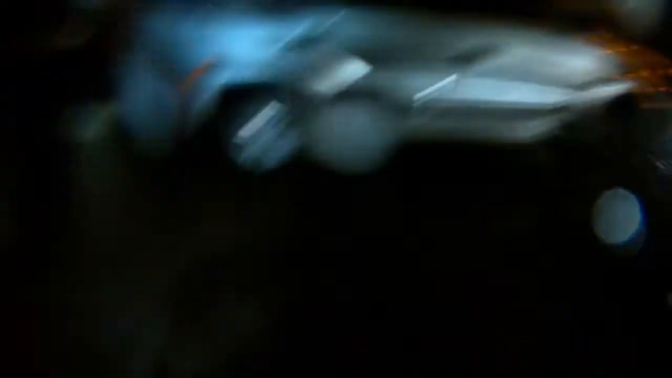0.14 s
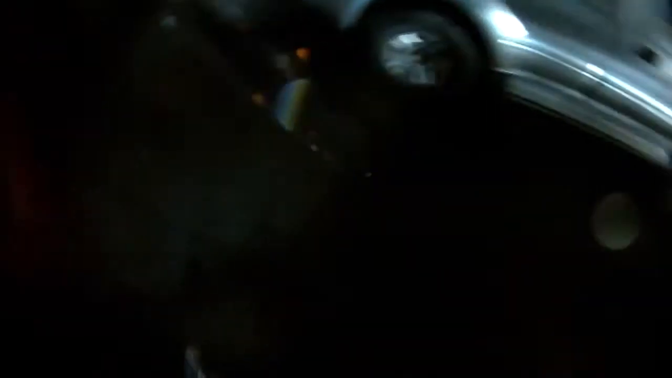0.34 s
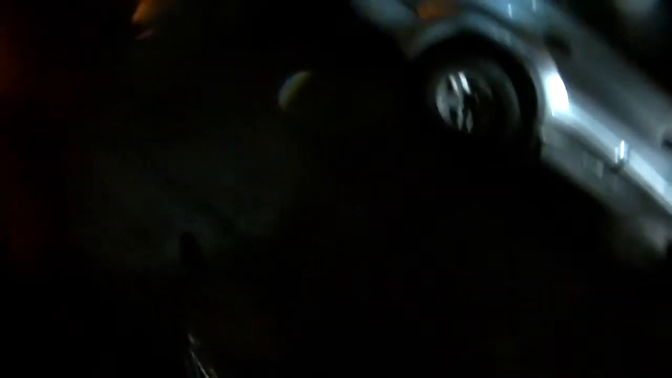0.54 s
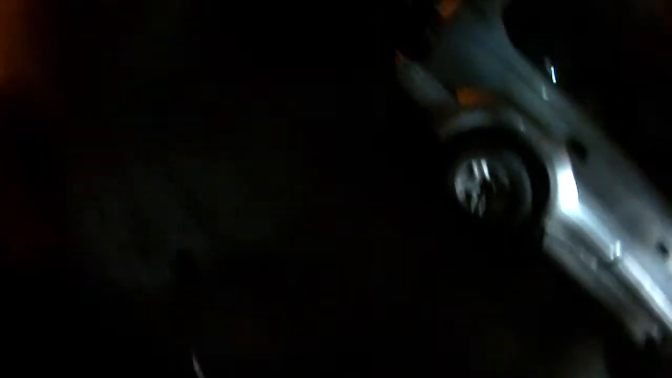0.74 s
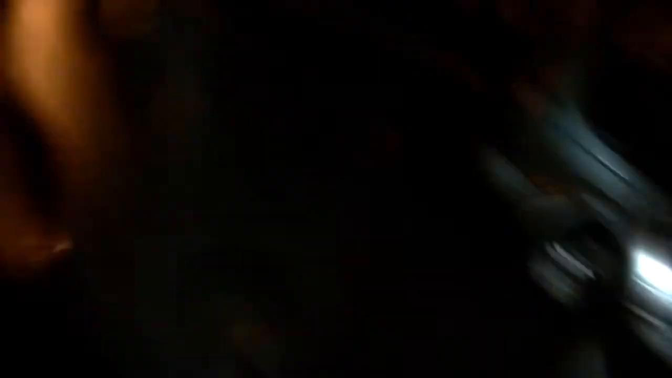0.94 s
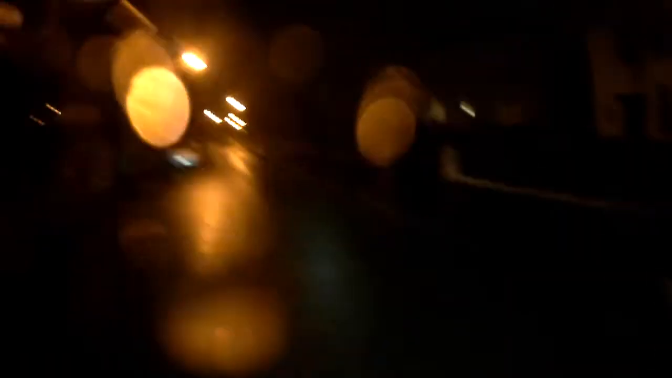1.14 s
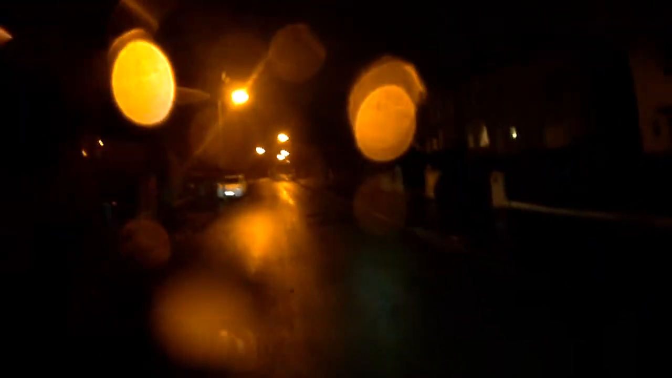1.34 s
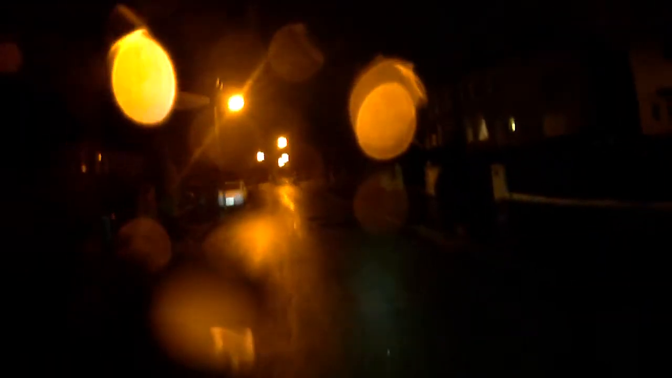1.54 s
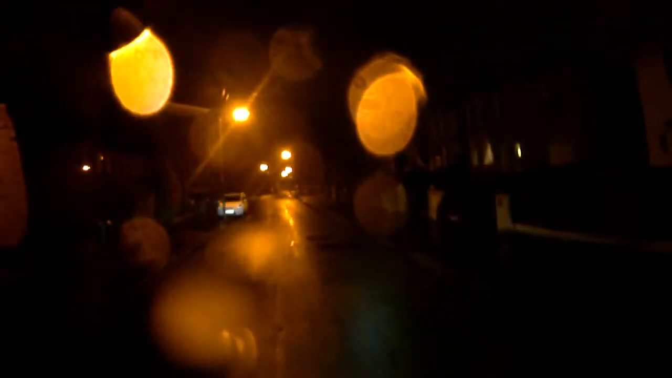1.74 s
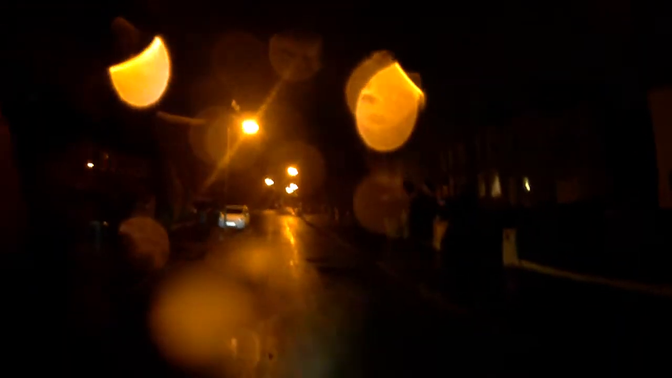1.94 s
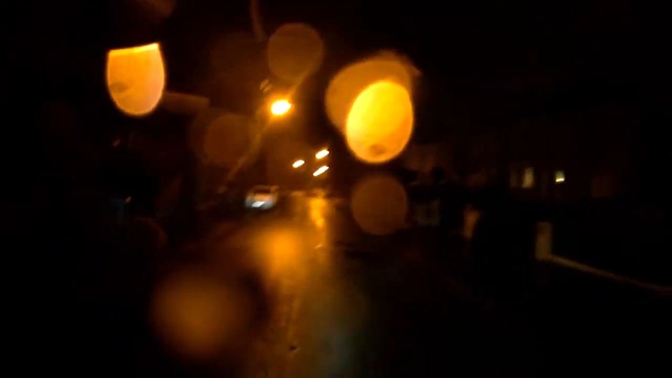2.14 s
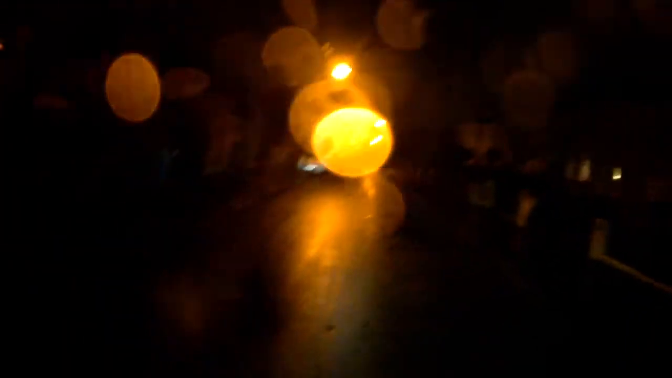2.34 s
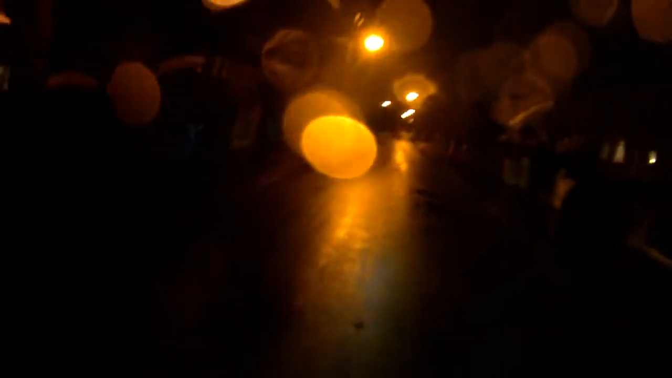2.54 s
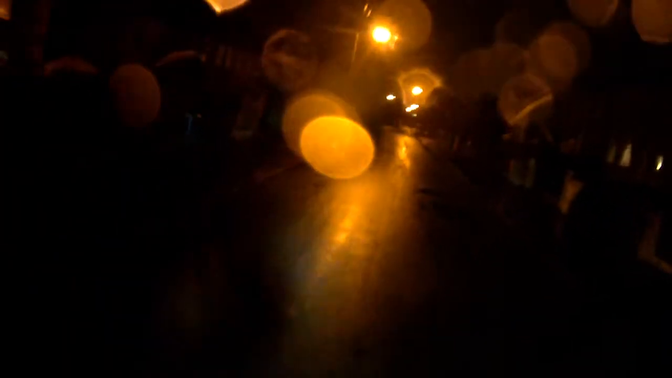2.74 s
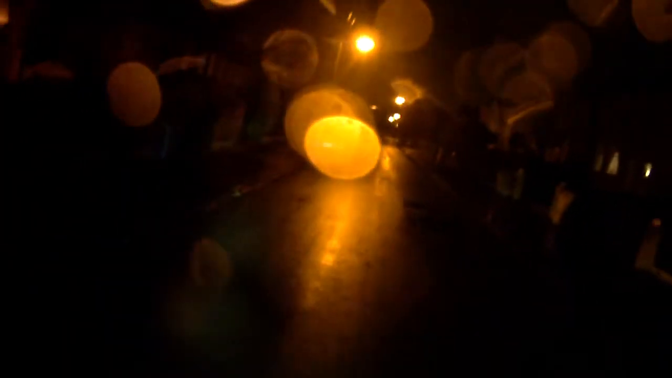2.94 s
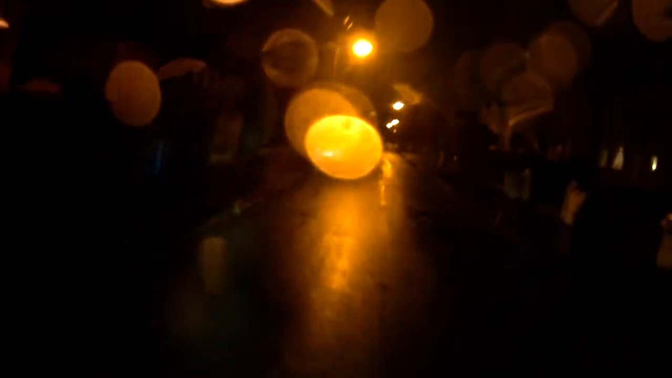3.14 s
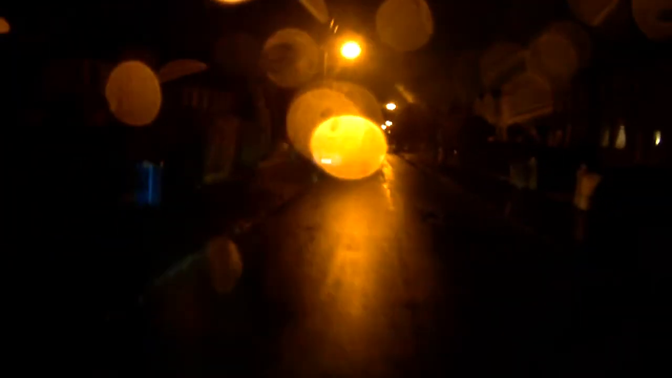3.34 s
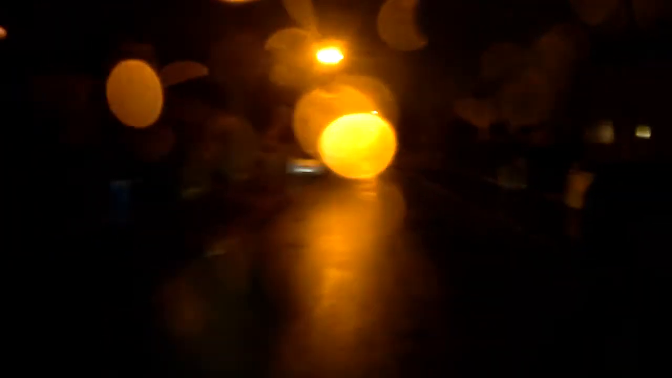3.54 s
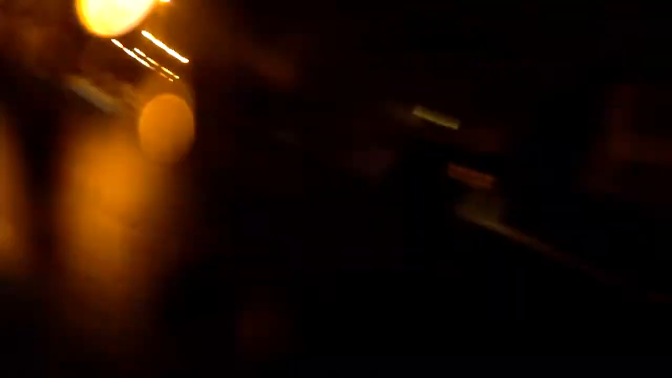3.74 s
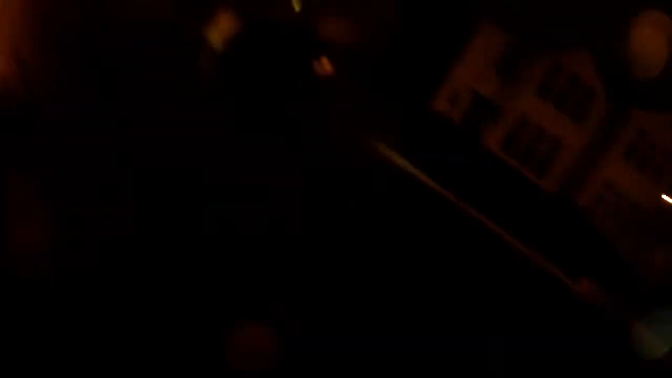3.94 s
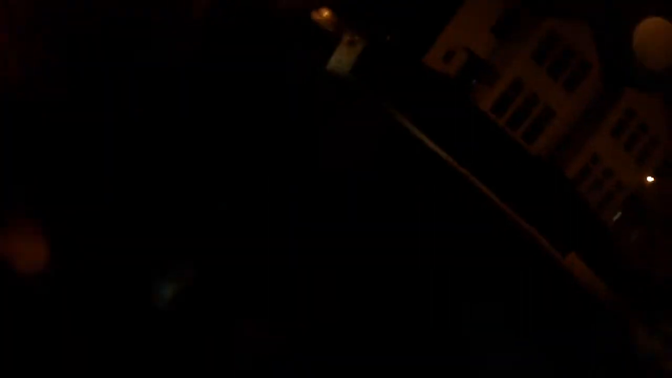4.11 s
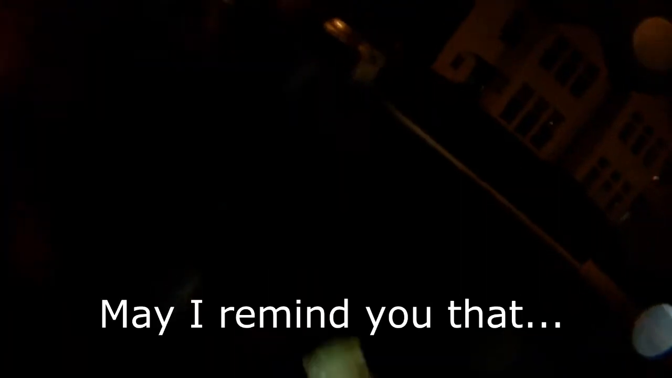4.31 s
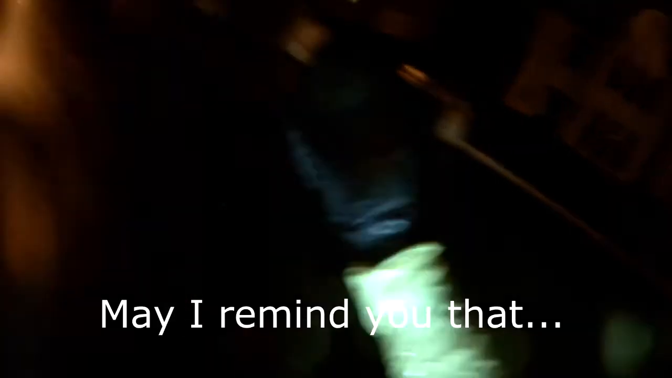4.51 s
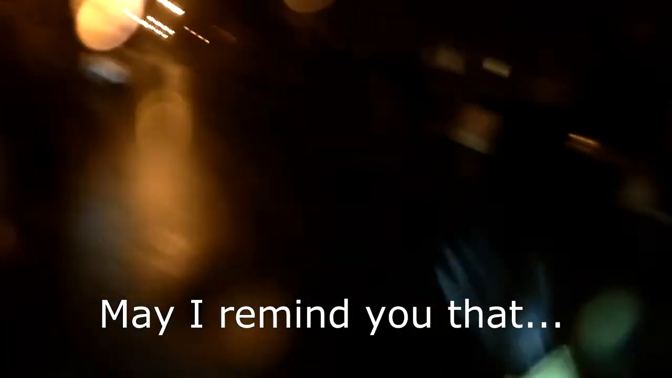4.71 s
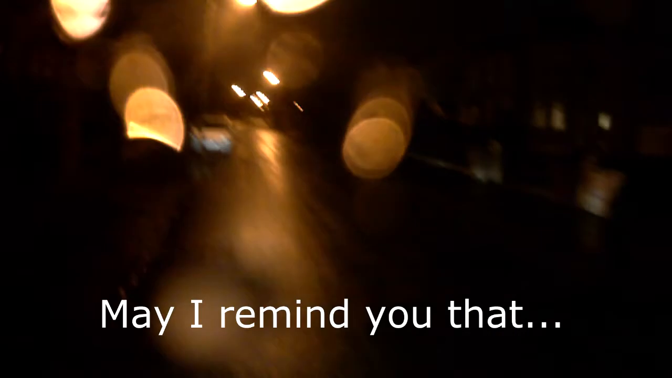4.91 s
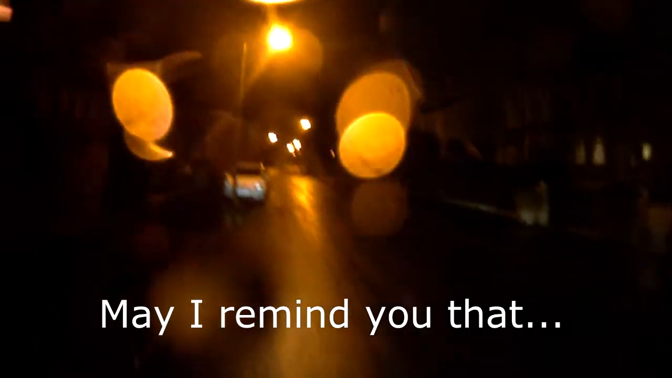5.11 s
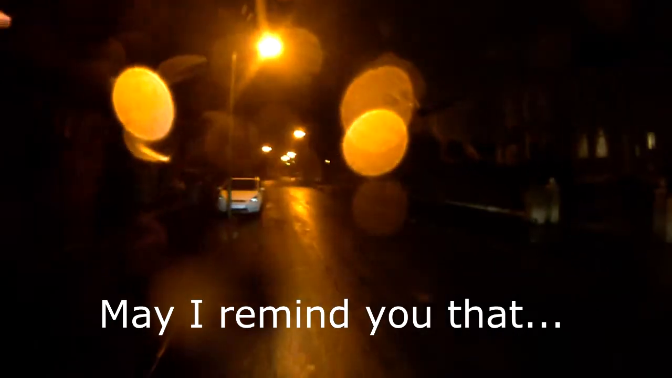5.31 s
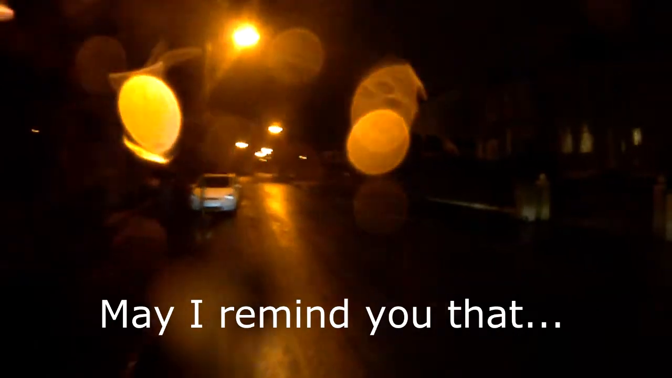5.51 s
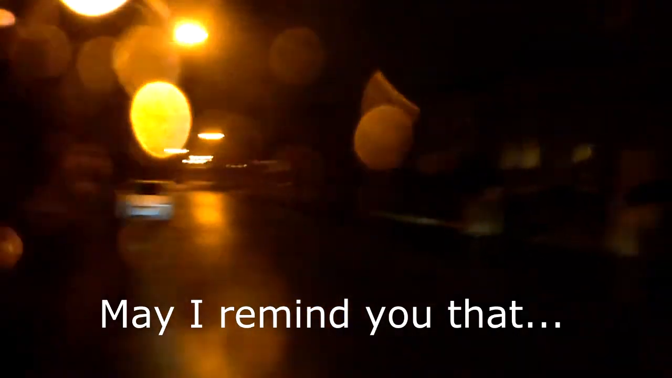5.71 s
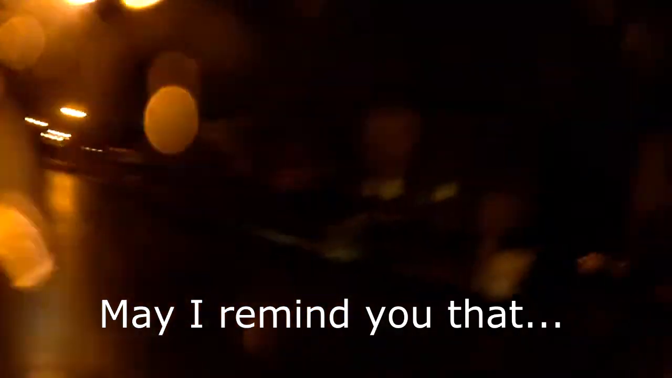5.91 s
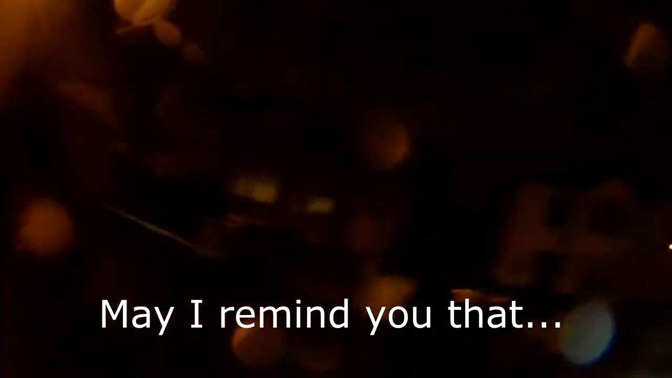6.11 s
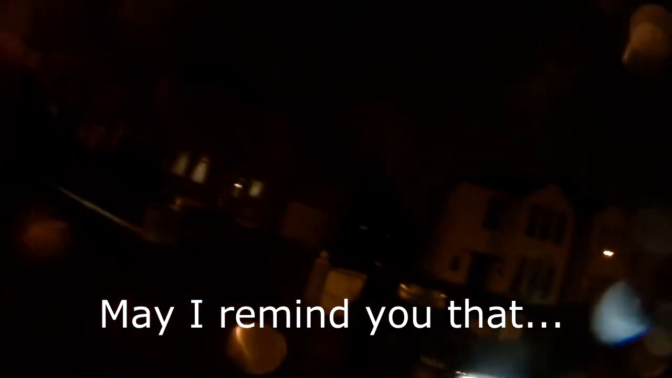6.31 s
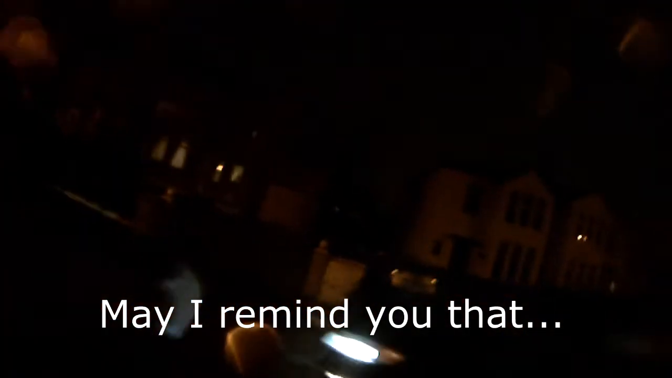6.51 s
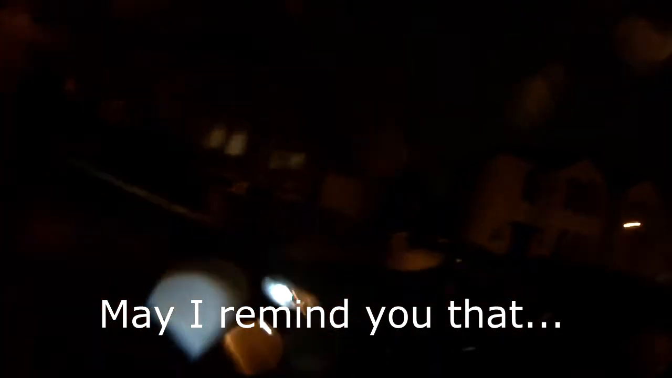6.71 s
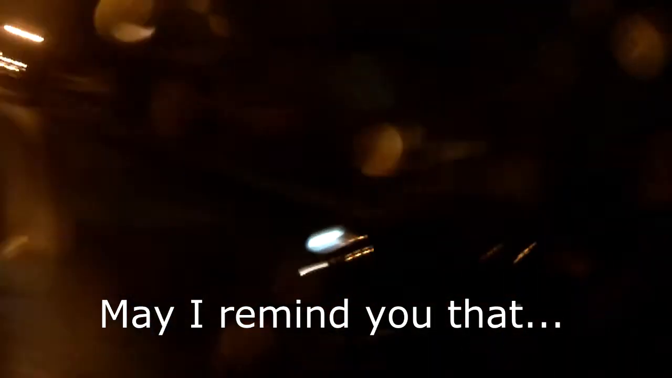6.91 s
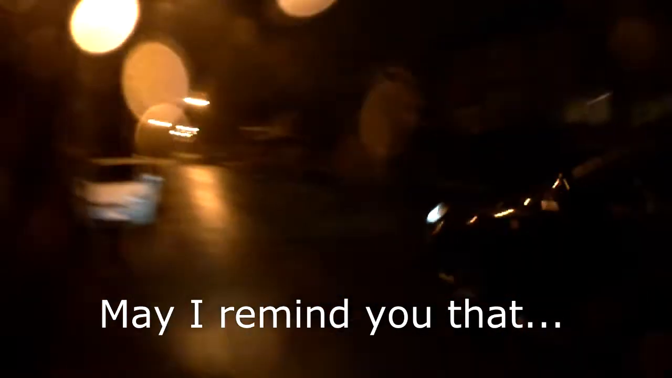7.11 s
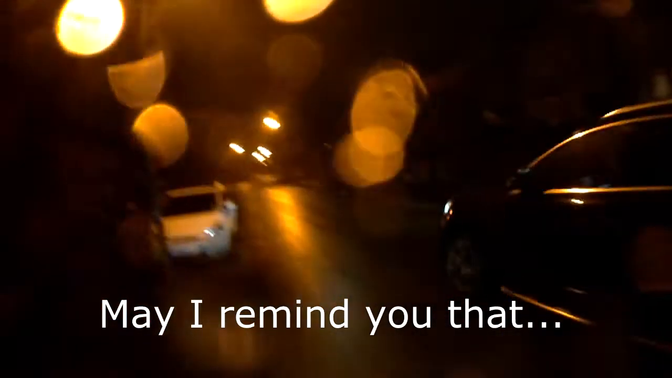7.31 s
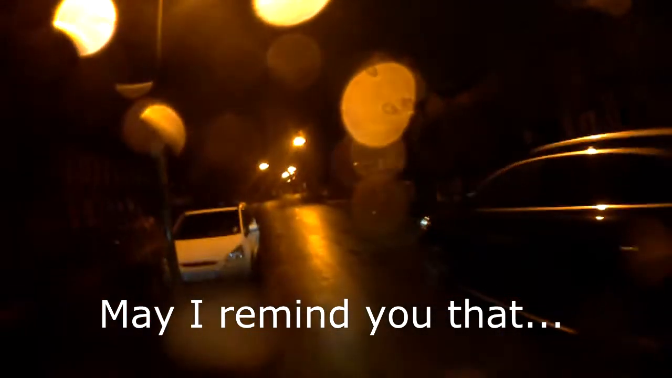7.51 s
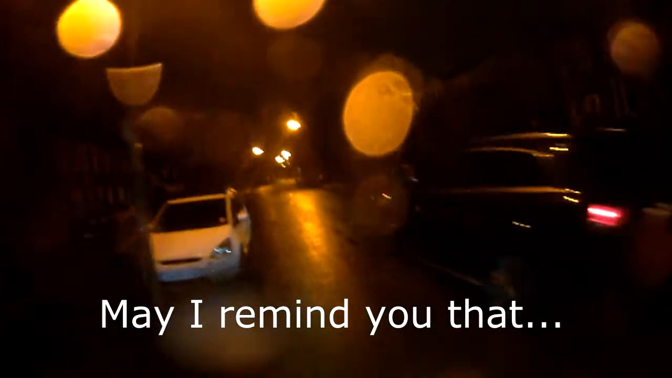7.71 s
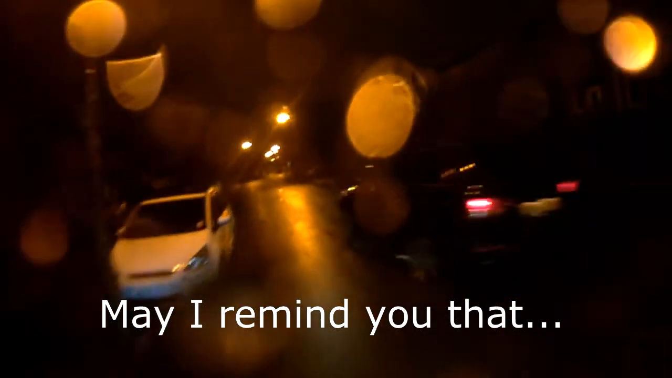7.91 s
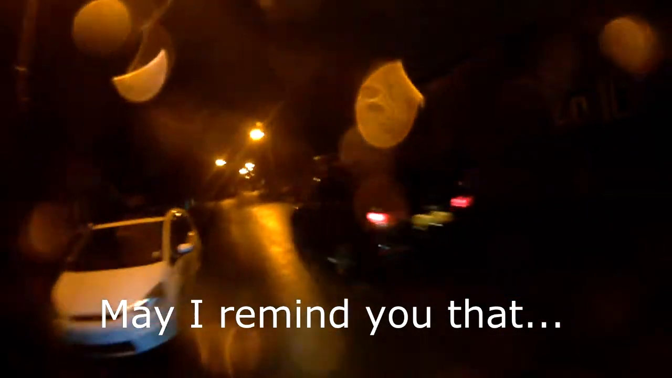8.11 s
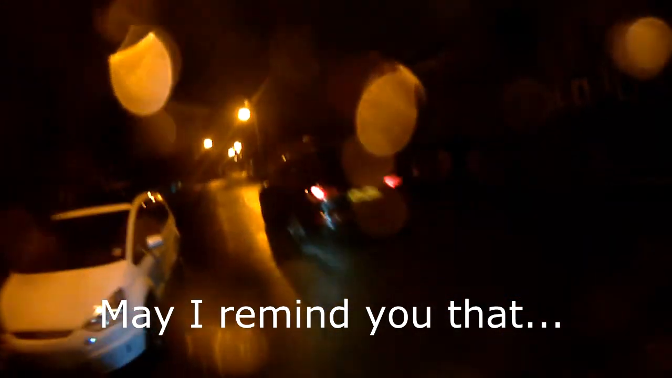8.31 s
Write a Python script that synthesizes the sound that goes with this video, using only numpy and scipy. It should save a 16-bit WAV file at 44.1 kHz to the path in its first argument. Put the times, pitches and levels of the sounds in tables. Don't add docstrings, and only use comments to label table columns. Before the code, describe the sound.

A diesel car idles quietly beside a cyclist in rain, then revs, surges and passes with wet tyre hiss while drops tick sharply on the microphone case.

```python
import sys
import numpy as np
from scipy import signal
from scipy.fft import rfft, irfft, next_fast_len
from scipy.io import wavfile
from scipy.ndimage import uniform_filter1d

SR = 44100
rng = np.random.default_rng(int(sys.argv[2]) if len(sys.argv) > 2 else 0)


def output_pcm(signal):
    pcm = np.clip(np.atleast_2d(signal).T, -1, 1) * 32767
    wavfile.write(sys.argv[1], SR, np.round(pcm).astype(np.int16))


def gain_from_db(level_db):
    decades = np.asarray(level_db, float) / 20
    return 10 ** decades


N = 368235
T = np.arange(N) / SR

# (time [s], firing rate [Hz], clean knock against tyre roar [dB])
ENGINE_SPEED = [(0, 39, 1.5), (.9, 38.98, 3.5), (1.1, 38.94, 1.5), (1.9, 39.02, 4), (2.1, 38.9, -1.5),
                (2.45, 39, 1.5), (2.8, 43.34, -1), (3.0, 54.75, -1), (3.3, 68.3, -4), (3.45, 73.2, -8),
                (3.9, 80.5, -6), (4.2, 87.9, -28), (4.5, 94.4, -23), (4.85, 107.8, -15), (5.15, 108.9, -7),
                (5.5, 117.1, -10), (5.75, 121.5, -11), (6.2, 121.4, -12.5), (6.55, 117.8, -17),
                (7.55, 118.4, -20), (7.85, 114, -5), (8.15, 106, -33), (8.35, 104, -24)]
# (time [s], level [dB], how far it stands to the side of the turning head [0-1])
CAR_HEARD = [(0.0, -47.5, 0.8), (0.88, -51, 0.72), (1.02, -48.5, 0.38), (2.07, -49.5, 0.34),
             (2.56, -52.5, 0), (3.23, -47, 0.19), (3.6, -46.5, 0.3), (3.95, -48.5, 0.2), (4.35, -44.5, 1),
             (4.72, -47.5, 0.07), (5.21, -41, 0.23), (5.6, -40.5, 0.18), (6.14, -38.5, 0.76),
             (6.49, -38, 0.86), (6.95, -36, 0.93), (7.46, -38, 0.96), (7.98, -40.5, 0.84),
             (8.35, -42, 0.87)]


def car():
    hz, knock_db = curves(ENGINE_SPEED)
    near_db = curves(CAR_HEARD)[0]
    first_strong_s = .083
    turns = np.cumsum(hz) / SR - first_strong_s * hz[0] + 6
    count = turns.astype(int)
    chance = rng.standard_normal(count[-1] + 1)
    load = np.clip((hz - 45) / 30, 0, 1)

    drive, bark = firings(hz, turns, count, chance)
    pan_late_s, pan_scatter_db = .005, 2
    late = np.roll(drive * gain_from_db(pan_scatter_db * np.roll(chance, 7)[count]), int(pan_late_s * SR))

    block = block_and_roar(drive, late, bark, load, knock_db)
    upper = upper_roar(load) + cylinder_head(late)
    body = block + upper + intake(hz, turns, chance)
    tones = exhaust(turns) + singing(turns)
    return gain_from_db(near_db + 1.34) * body + np.sqrt(2) * (tones + turbo())


CYLINDER_LEVELS = [0, -2.5, -1, -4.5, -3.5, -4.5]


def firings(hz, turns, count, chance):
    pulses = np.zeros(N)
    at = np.flatnonzero(np.diff(count)) + 1
    size = gain_from_db(np.array(CYLINDER_LEVELS)[count % 6] + 1.2 * chance[count])
    pulses[at] = size[at] / np.sqrt(hz[at])
    rattle = rng.standard_normal(1500) * np.exp(-np.arange(1500) / SR / .005)
    rattle[0] = 13.
    rattle = irfft(np.exp(1j * np.angle(rfft(rattle))))
    clatter = (size * np.exp(-(turns % 1) / 0.61) + 0.27) * rng.standard_normal(N)
    drive = unit(signal.fftconvolve(pulses, rattle)[:N]) + gain_from_db(-11) * unit(clatter)
    bark = signal.fftconvolve(pulses * (count % 6 == 0), rattle)[:N]
    return drive, bark


# (frequency [Hz], width [Hz], level [dB])
BLOCK_MODES = [(782, 120, 0), (935, 60, -4), (640, 120, -16)]
# (frequency [Hz], width [Hz], level [dB])
BLOCK_TURNED_MODES = [(900, 150, 1), (790, 80, -2), (620, 120, -18)]
# (frequency [Hz], width [Hz], level [dB])
UNDERBODY_MODES = [(760, 330, 0), (1250, 400, -4), (480, 200, -6)]
# (frequency [Hz], density [dB per Hz])
ROAR_COLOUR = [(260, -19.5), (450, -4), (769, -0.5), (851, -1), (921, -1.5), (998, -0.5), (1350, -1.5),
               (1600, -9.5), (2080, -10.5), (3520, -120)]


def block_and_roar(drive, late, bark, load, knock_db):
    turn_s, turn_length_s = 1.07, 0.97
    turned = np.clip((T - turn_s) / turn_length_s, 0, 1)
    pan = [(1300, 180, 0)]  # Hz, width Hz, dB
    idle = np.sqrt(1 - turned) * unit(resonate(drive, BLOCK_MODES))
    idle = idle + np.sqrt(turned) * unit(resonate(drive, BLOCK_TURNED_MODES))
    idle = idle + gain_from_db(-4.5) * unit(resonate(late, pan))
    knock = (1 - 0.64 * load) * idle + load * unit(resonate(drive, UNDERBODY_MODES))

    share = gain_from_db(knock_db) / np.sqrt(1 + gain_from_db(2 * knock_db))
    rest = np.sqrt(1 - share ** 2)
    block = share * knock + rest * patchy(ROAR_COLOUR, 2.0, 5, count=9)
    # Hz, width Hz, depth 0-1
    idle_gap, load_gap = (1080, 200, .5), (510, 140, .5)
    block = block - (1 - load) * dip(block, *idle_gap) - load * np.clip(6.6 - T, 0, 1) * dip(block, *load_gap)
    bark_db, bark_s, bark_half_s = -10, 5.2, 2.6
    return block + gain_from_db(bark_db) * swell(bark_s, bark_half_s) * load * unit(resonate(bark, UNDERBODY_MODES))


# (frequency [Hz], density [dB per Hz])
UPPER_ROAR_COLOUR = [(1300, 2.5), (1600, 2.5), (1900, 2), (2300, -35), (2500, -9), (2800, -10),
                     (3300, -20.5)]


def upper_roar(load):
    level_db = by_side((1, -13)) - 3.5 * (1.5 - load)
    return gain_from_db(level_db) * patchy(UPPER_ROAR_COLOUR, 3.45, 5, count=4)


# (time [s], how far its pitch has sunk [0-1], gain [dB])
HEAD_RING_COURSE = [(0, 0.93, -15), (.21, 0.25, -0.5), (.88, 0.1, -4), (1.11, 0.2, 1.5), (1.5, .3, -2),
                    (1.65, 0.5, 5.5), (2, 0.5, -3), (2.25, 0.97, 0), (4.5, 0.53, -1), (5.1, 0.91, 3),
                    (5.9, .4, 2), (6.02, 0.1, 0), (6.24, 0.38, 3), (6.36, 0.95, -7), (6.84, .9, 2.5),
                    (7.19, 0.73, -0.5), (8.35, 0.89, -2)]


def cylinder_head(late):
    sunk, gain_db = curves(HEAD_RING_COURSE)
    sunk = np.clip(sunk, 0, 1)
    high, low = [(2205, 93, 0)], [(2098, 118, 0)]  # Hz, width Hz, dB
    shake = np.roll(late, 200) + 1.1 * rng.standard_normal(N)
    head = np.sqrt(1 - sunk) * unit(resonate(shake, high)) + np.sqrt(sunk) * unit(resonate(shake, low))
    lift_off_s, lift_off_db_per_s = 6.66, -6.5
    level_db = by_side((-12.5, -15)) + 5 + lift_off_db_per_s * np.maximum(T - lift_off_s, 0)
    return gain_from_db(level_db + gain_db) * head


# (frequency [Hz], width [Hz], level [dB])
INTAKE_MODES = [(395, 45, 0), (355, 40, -3), (310, 60, -10)]
# (middle [s], half length [s], gain [dB])
INTAKE_SURGES = [
    (5.8, 0.63, 1.5),
    (6.545, 0.17, 4),
    (6.102, .2, 1),
    (7.002, 0.2, 0),
    (7.44, 0.14, 5.5),
    (7.62, 0.13, 2),
]


def intake(hz, turns, chance):
    intake_order, gulp_turns, gulp_s, gulp_fades_s = 3.19, 0.77, 6.052, 5.4
    cycle, since = np.divmod(turns - turns[int(gulp_s * SR)], 6)
    breath = since / gulp_turns * np.exp(1 - since / gulp_turns) * gain_from_db(.8 * chance[cycle.astype(int)])
    fade = np.clip(1 - (T - gulp_fades_s) / 3.5, 0, 1)
    gulp = breath * np.sin(2 * np.pi * intake_order * since) * fade
    boost = np.clip((hz - 95) / 20, 0, 1)
    rush = unit(resonate(rng.standard_normal(N), INTAKE_MODES))
    boom = 1.25 * boost * unit(gulp) + (1 - 0.5 * boost) * rush
    surge_db = sum(db * swell(s, half) for s, half, db in INTAKE_SURGES)
    return gain_from_db(by_side((-18.5, -12.5)) + 8 * boost + surge_db) * boom


# (middle [s], half length [s], level [dB])
EXHAUST_SWELLS = [
    (5.294, 0.58, -54.5),
    (5.827, 0.32, -51),
    (6.5, 0.15, -48),
    (6.899, 0.6, -47.5),
    (7.668, 0.44, -38.5),
]


def exhaust(turns):
    note = sum(gain_from_db(db) * swell(s, half) for s, half, db in EXHAUST_SWELLS)
    return note * sway(0.58, 8.9) * np.sin(4 * np.pi * turns)


# (multiple of firing rate, middle [s], half length [s], level [dB])
SINGING_OVERTONES = [(13, 3.1, .15, -62), (12, 3.3, .25, -58), (11, 3.3, .3, -58), (10, 3.3, .25, -58),
                     (8.33, 3.3, .15, -58), (3, 3.5, .55, -59), (7.33, 3.65, .2, -56), (11, 3.9, .2, -55),
                     (10, 3.7, .15, -58), (9, 4.35, .35, -55), (8, 4.2, .2, -57), (7.5, 4.45, .15, -55),
                     (10, 4.2, .12, -56), (9, 5.0, .3, -52), (5.5, 5.1, .5, -54), (7, 5.75, .6, -48),
                     (9.33, 5.3, .25, -50), (6.83, 5.75, .4, -50), (6.5, 5.35, .2, -51), (6, 5.35, .2, -52),
                     (6, 6.05, .3, -45), (11.5, 5.7, .55, -51), (9.33, 5.85, .3, -50), (10, 6.3, .15, -50),
                     (8.17, 5.6, .3, -48), (7.5, 6.75, .35, -46), (3.33, 6.45, .3, -49), (5, 6.6, .3, -48),
                     (8.33, 7.1, .4, -46), (9.17, 7.15, .15, -48), (3.33, 7.5, .25, -47),
                     (1, 6.2, .12, -51), (1, 7.0, .28, -52), (1, 7.55, .08, -49), (1.33, 4.5, .13, -50),
                     (5, 7.85, .12, -50)]


def singing(turns):
    tones = np.zeros(N)
    rough_db, rough_turns = 2, .03
    wobble = rough_turns * walk(30)
    for order, s, half, db in SINGING_OVERTONES:
        on = abs(T - s) < half
        level = gain_from_db(db + .5) * swell(s, half, T[on]) * sway(rough_db, 14)[on]
        tones[on] += level * np.sin(2 * np.pi * (order * turns[on] + wobble[on]))
    return tones


# (time [s], whistle [Hz], level [dB])
TURBO_WHISTLE = [
    (5.1, 10600, -98),
    (5.3, 11150, -85),
    (5.6, 12230, -80),
    (5.85, 12330, -77),
    (6.15, 12150, -73),
    (6.65, 11800, -78),
    (7.25, 11680, -72),
    (7.6, 11560, -75),
    (7.95, 11480, -95),
]


def turbo():
    hz, level_db = curves(TURBO_WHISTLE)
    turns = np.cumsum(hz + 75 * walk(300)) / SR
    return gain_from_db(level_db + 2) * sway(2.5, 25) * np.sin(2 * np.pi * turns)


# (time [s], level [dB])
SPRAY_LEVEL = [(0.0, -62.5), (0.3, -65), (0.95, -69.5), (1.3, -63), (1.8, -63), (2.3, -65.5), (3.19, -67),
               (3.63, -60.5), (4.02, -64), (4.74, -60.5), (4.9, -54), (5.77, -50), (6.12, -53),
               (6.4, -51.5), (6.93, -49.5), (7.46, -50.5), (8.35, -52)]
# (frequency [Hz], density [dB per Hz])
HISS_COLOUR = [(2180, -64), (3700, -9.5), (4450, 3.5), (4660, 2.5), (4830, -0.5), (5310, 1.5), (6200, -1),
               (8060, -42), (13600, -120)]
# (frequency [Hz], density [dB per Hz])
TOP_RING_COLOUR = [(5700, -33), (6200, -6.5), (6700, 6), (7050, -6), (7500, -13), (8200, -29)]
# (frequency [Hz], density [dB per Hz])
GAP_COLOUR = [(2300, 5.5), (2600, 2.5), (3200, 3), (3700, -0.5), (4100, 4)]
# (frequency [Hz], density [dB per Hz])
MIST_COLOUR = [(6800, -4), (7600, 4), (8300, 2), (8900, 2.5), (9400, 1.5), (10100, 2.5), (10900, -4.5),
               (12000, -1), (15000, -6), (16000, -16)]
# (middle [s], half length [s], gain [dB])
PUDDLE_MIST = [
    (5.299, .5, 1),
    (6.1, 0.23, 5),
    (7.25, 0.36, 2.5),
    (8.099, 0.33, -5),
]
# (frequency [Hz], width [Hz], middle [s], half length [s], depth [0-1])
HELMET_SHADOWS = [
    (5252, 300, 5.45, 0.55, 0.3),
    (5100, 210, 6.3, .45, .6),
    (6300, 390, 6.7, 0.54, 0.6),
    (5950, 350, 7.67, 0.46, 0.6),
    (4600, 380, 8.0, .35, 0.4),
]


def spray():
    level_db, = curves(SPRAY_LEVEL)
    alongside_s, alongside_half_s, alongside_db = 7.4, 0.51, 7
    ring_db = by_side((-7.5, -10)) + alongside_db * swell(alongside_s, alongside_half_s)
    puddle_db = sum(db * swell(s, half) for s, half, db in PUDDLE_MIST)
    damp_air_db = -80
    mist = np.hypot(gain_from_db(level_db + by_side((-20, -13.5)) + puddle_db), gain_from_db(damp_air_db))
    hiss = patchy(HISS_COLOUR, 1.8, 7, count=6)
    for hz, width, s, half, depth in HELMET_SHADOWS:
        hiss = hiss - swell(s, half) * dip(hiss, hz, width, min(depth, 1))
    top_ring = gain_from_db(ring_db) * patchy(TOP_RING_COLOUR, 0.67, 6.7, count=3)
    gap = gain_from_db(by_side((-13.5, 3.5))) * patchy(GAP_COLOUR, 1.0, 7.6, count=4)
    fine = gain_from_db(2.5) * mist * patchy(MIST_COLOUR, 1.3, 5, count=7)
    return gain_from_db(level_db) * (hiss + top_ring + gap) + fine


# (frequency [Hz], width [Hz], middle [s], half length [s], level [dB])
NOISE_BANDS = [(4500, 313, 5.4, 0.5, -56.5), (5600, 250, 5.9, .2, -57), (5600, 270, 6.75, 0.41, -55.5),
               (6700, 255, 4.3, 0.38, -76), (8800, 298, 5.8, .4, -74), (9185, 385, 7.0, 0.31, -66),
               (10290, 314, 6.85, .25, -68), (10300, 500, 8.1, .3, -74), (8860, 500, 8.05, .3, -74),
               (8050, 486, 5.3, .4, -67), (9100, 400, 5.3, .35, -70), (4078, 440, 6.8, .4, -53),
               (2899, 280, 5.6, .5, -56), (6600, 290, 7.4, 0.51, -55.5), (4310, 250, 7.1, 0.28, -54),
               (190, 73, 4.25, .12, -47), (223, 86, 4.22, 0.1, -51), (719, 216, 7.6, .3, -42),
               (579.6, 76, 5.9, 0.34, -46), (580, 170, 6.5, .3, -45), (804, 190, 7.85, .15, -45),
               (2680, 400, 2, .5, -66), (1052, 202, 5.35, .2, -45), (1800, 660, 1.2, .5, -59)]


def noise_bands():
    out = np.zeros(N)
    for hz, width, s, half, db in NOISE_BANDS:
        noise = rng.standard_normal(SR + SR // 2)[:int(2 * half * SR)]
        shape = gain_from_db(db) * swell(half, half, T[:len(noise)])
        add(out, s - half, shape * unit(resonate(noise, [(hz, width, 0)])))
    return out


# (time [s], peak [dB], ring [Hz], wall knock relative [dB], splash relative [dB])
BIG_DROPS = [(0.171, -31, 4640, -6, -11), (1.2142, -23.5, 5200, -5, -13), (1.8201, -33, 4500, -2.5, -20),
             (1.8991, -21.5, 6000, -26, -19), (2.1271, -18.5, 5020, -13, -15),
             (2.468, -33.5, 4800, -14, -20), (2.5343, -18.5, 5040, -8.5, -20),
             (2.6462, -10.5, 4710, -17.5, -20), (2.6786, -35, 4500, 0.5, -7), (2.805, -26.5, 5050, -9, -14),
             (3.5138, -35, 3280, 2, -19), (3.8724, -6, 5170, -12, -21.5), (4.1976, -21.5, 4740, -2.5, -17),
             (4.22, -27, 3820, -8, -12), (4.4287, -31, 3142, -5, -20), (4.9122, -28.5, 4618, -13, -15.5),
             (5.1013, -29, 4740, -2.5, -18), (5.9863, -26.5, 4500, -13, -34), (6.06, -26, 3040, -18, -14),
             (6.2059, -30.5, 4180, -3, -15), (6.548, -27.5, 4200, -17, -21), (6.607, -30, 5600, -10, -10),
             (7.7378, -18, 5053, -11, -20), (8.2576, -28.5, 6460, -14, -13)]
# (time [s], peak [dB], ring [Hz])
SMALL_DROPS = [(0.319, -43, 4360), (1.06, -44, 3900), (1.1666, -41.5, 4570), (1.1954, -38, 6400),
               (1.573, -44, 4500), (1.698, -35.5, 4770), (1.7891, -37, 5100), (2.205, -38, 4960),
               (2.2725, -41.5, 6000), (2.7112, -43, 4530), (2.9693, -40.5, 4066), (2.9947, -40.5, 4150),
               (3.066, -41.5, 4020), (3.25, -41, 4730), (3.271, -46, 4500), (3.6423, -38.5, 4600),
               (3.716, -42, 4670), (3.8905, -36.5, 4200), (3.933, -35.5, 3040), (5.4953, -31, 4700),
               (5.79, -51, 13000), (5.95, -47, 9590), (6.082, -27.5, 7000), (6.21, -34, 6890),
               (6.284, -46, 9000), (6.39, -44, 7800), (6.917, -38, 6990), (7.336, -39, 9790),
               (7.9791, -44, 4150)]
# (frequency [Hz], level [dB], decay t60 [s])
CASE_MODES = [(4300, -3, .0055), (5560, -4, .0045), (6700, -6, .0045), (3500, -10, .004)]
# (frequency [Hz], level [dB], decay t60 [s])
WALL_MODES = [(1200, -1, .008), (1750, -3, .006), (2600, -1, .005), (750, -2, .007), (480, -6, .008),
              (310, -8, .011)]
# (frequency [Hz], level [dB], decay t60 [s])
SPLASH_MODES = [(9600, 1, 0.0024), (11430, 2.5, 0.0026), (13500, -2, 0.0023)]
# (frequency [Hz], level [dB], decay t60 [s])
SOFT_KNOCK_MODES = [(1222, 9, 0.0063), (1000, -6, .008), (1580, -6, .006)]


def drops():
    out, t = np.zeros(N), np.arange(800) / SR
    faint = rng.random((160, 3))
    drizzle = [(a * N / SR, -60 + 4 * -np.log(b), 3800 + 2500 * c, -6, -22) for a, b, c in faint]
    small = [(*row, -1, -16) for row in SMALL_DROPS]
    events = list(BIG_DROPS) + small + drizzle
    chance = rng.standard_normal((len(events), 13))
    rise = np.clip(t / 0.00033, 0, 1)
    for (s, db, hz, wall_db, splash_db), c in zip(events, chance):
        damp = np.interp(hz, (4740, 4800), (1, 1.7))
        modes = [(hz, 0, .005)] + CASE_MODES
        case = ring(modes, np.r_[1, 1 + .03 * c[:4]] / damp, t * damp)
        heard = np.clip((db + wall_db + 46) / 8, 0, 1)
        wall = gain_from_db(wall_db + 6) * heard * ring(WALL_MODES, 1 + c[4:10] / 20, t) * np.clip(t / 0.00061, 0, 1)
        splash = gain_from_db(splash_db + 1.5) * ring(SPLASH_MODES, 1 + c[10:] / 20, t)
        add(out, s + 0.00084, -gain_from_db(db + 10.0) * rise * (case + wall + splash))
    soft_knock_s, soft_knock_db = 2.4686, -12
    add(out, soft_knock_s, gain_from_db(soft_knock_db) * ring(SOFT_KNOCK_MODES, [1, 1, 1], t) * np.clip(t / 0.00083, 0, 1))
    return signal.sosfilt(signal.butter(2, 220, "high", fs=SR, output="sos"), out)


# (time [s], level [dB])
GUSTS = [(0.0, -53), (0.37, -62.5), (0.95, -58), (1.25, -61.5), (1.63, -58.5), (2.0, -66), (2.6, -64),
         (2.74, -57.5), (3.12, -65.5), (3.8, -59.5), (4.06, -59), (4.2, -50.5), (4.36, -56.5), (4.55, -60),
         (4.75, -62.5), (6.05, -58.5), (6.5, -50.5), (6.9, -57), (7.3, -57), (7.55, -52), (7.9, -57),
         (8.35, -58)]
# (frequency [Hz], density [dB per Hz])
RUMBLE_COLOUR = [(8, -38), (20, -17.5), (60, -23.5), (110, -20.5), (160, -33)]
# (frequency [Hz], density [dB per Hz])
BUFFET_COLOUR = [(80, -19.5), (130, -1.5), (300, 4), (500, -7), (700, -10)]
# (time [s], peak [dB])
ROAD_JOLTS = [(0.112, -40), (0.195, -45), (0.473, -46), (0.668, -48), (0.79, -50), (1.024, -42),
              (1.06, -43), (1.107, -46), (1.398, -44), (1.997, -41), (2.75, -36.5), (2.799, -48),
              (2.841, -39.5), (3.078, -47), (3.118, -41), (3.682, -52), (3.975, -45), (4.148, -42),
              (4.3, -50), (4.411, -48), (4.52, -45), (4.724, -42.5), (7.057, -50), (7.558, -43)]
# (time [s], peak [dB], sharp to dull [-1 to 1])
AIR_SLAPS = [(0.053, -33, -1.2), (0.117, -32, -0.15), (0.207, -45, 0.85), (0.792, -45, 0.86),
             (0.986, -39, -1), (1.06, -38.5, 0.68), (1.313, -36, -0.89), (1.391, -33.5, -0.46),
             (1.501, -39, -1), (1.606, -46, 0.84), (1.705, -39.5, -1.1), (1.99, -34, -0.29),
             (2.47, -33.5, -0.44), (2.698, -36, 0.12), (2.81, -44, 1), (2.97, -39, -0.71),
             (3.155, -35, -1.3), (3.479, -33, -0.69), (3.516, -36, -1.2), (3.675, -36.5, -0.19),
             (3.975, -34.5, 1), (4.102, -32, -1), (4.164, -37, -1), (4.184, -37, 1), (4.229, -34, 0.14),
             (4.511, -37, 0.98), (4.566, -39, 1), (4.691, -35.5, -0.76), (6.444, -30, 1), (6.483, -29, 1)]


def wind():
    gust_db, = curves(GUSTS)
    buffet_db, buffet_db_per_s, wake_db = -0.5, 1.84, -17.5
    own_speed = gain_from_db(gust_db + buffet_db + buffet_db_per_s * np.minimum(T, 5.5))
    buffet = np.hypot(own_speed, gain_from_db(curves(CAR_HEARD)[0] + wake_db))
    out = gain_from_db(gust_db - 1.0) * patchy(RUMBLE_COLOUR, 1.1, 4.9, count=2)
    out = out + buffet * patchy(BUFFET_COLOUR, 3.2, 18, count=3)

    jolt_hz, dull_hz, sharp_hz, tilt_db = 79, 199, 393, 31
    thuds = [(s, db, jolt_hz) for s, db in ROAD_JOLTS]
    thuds += [(s, db + tilt_db * min(dull, 0), dull_hz) for s, db, dull in AIR_SLAPS]
    thuds += [(s, db - tilt_db * max(dull, 0), sharp_hz) for s, db, dull in AIR_SLAPS]
    for (s, db, hz), c in zip(thuds, rng.standard_normal(len(thuds))):
        hz = hz * (1 + .07 * c)
        cycles = np.arange(int(3 * SR / hz)) * hz / SR
        shape = (cycles / 0.87 * np.exp(1 - cycles / 0.74)) ** 2.4
        add(out, s - 0.82 / hz, -gain_from_db(db + 4) * np.sin(2 * np.pi * cycles) * shape)
    return out


def by_side(pair):
    side = curves(CAR_HEARD)[1]
    return pair[0] + (pair[1] - pair[0]) * np.clip(side, 0, 1)


def curves(table):
    s, *columns = np.transpose(table)
    return [np.interp(T, s, c) for c in columns]


def swell(s, half, t=T):
    return np.clip(1 - ((t - s) / half) ** 2, 0, 1)


def sway(db, rate):
    k = max(int(SR / 16 / rate), 1)
    held = np.repeat(rng.standard_normal(N // 16 // k + 2), k)
    slow = 1.3 * uniform_filter1d(uniform_filter1d(held, k), k)
    return np.repeat(gain_from_db(db * slow), 16)[:N]


def walk(rate):
    return np.log10(sway(18, rate))


def unit(x):
    return x / np.sqrt(np.mean(x ** 2))


def patchy(spectrum, flicker_db, rate, count):
    hz, db = np.transpose(spectrum)
    size = next_fast_len(N, True)
    place = np.log(np.maximum(np.arange(size // 2 + 1, dtype=np.float32) * SR / size, 1))
    colour = gain_from_db(np.interp(place, np.log(hz), db, -150, -150)).astype(np.float32)
    white = rfft(rng.standard_normal(size, np.float32)) * colour
    centres, step = np.linspace(np.log(hz[1]), np.log(hz[-2]), count, retstep=True, dtype=np.float32)
    place = np.clip(place, centres[0], centres[-1])
    out = 0
    for centre in centres:
        band = np.clip(1 - abs(place - centre) / np.float32(step), 0, 1)
        out = out + sway(flicker_db, rate) * irfft(white * band, size)[:N]
    return unit(out)


def resonate(x, modes):
    out = 0
    for k, (hz, width, db) in enumerate(modes):
        b, a = signal.iirpeak(hz, hz / width / 1.5, SR)
        out = out + (-1) ** k * gain_from_db(db) * signal.lfilter(b, a, signal.lfilter(b, a, x))
    return out


def dip(x, hz, width, depth):
    return depth * signal.lfilter(*signal.iirpeak(hz, hz / width, SR), x)


def ring(modes, detune, t):
    x = 0
    for (hz, db, t60), d in zip(modes, detune):
        x = x + gain_from_db(db) * np.sin(2 * np.pi * hz * d * t) * np.exp(-np.log(1000) * t / t60)
    return x / abs(x).max()


def add(out, s, x):
    i = min(max(int(s * SR), 0), N)
    out[i:i + len(x)] += x[:N - i]


def scene():
    return (car() + spray() + noise_bands() + drops() + wind())[None]


def top_cut(x):
    return signal.sosfilt(signal.butter(12, 16500, fs=SR, output="sos"), x)


def record(dry):
    self_noise_db, top_hz = -72, 15150
    highpass = signal.butter(2, 6000, "high", fs=SR, output="sos")
    hiss = signal.sosfilt(highpass, rng.standard_normal(dry.shape))
    lowpass = signal.cheby1(10, .5, top_hz, fs=SR, output="sos")
    mix = signal.sosfilt(lowpass, dry + gain_from_db(self_noise_db) * hiss)
    return top_cut(mix)


dry = scene()
out = record(dry)
output_pcm(out)
```